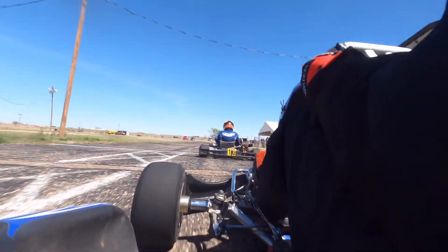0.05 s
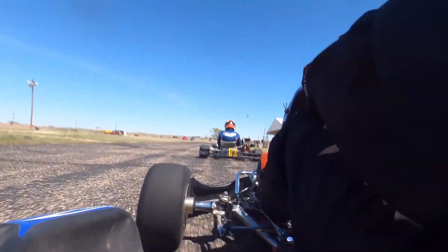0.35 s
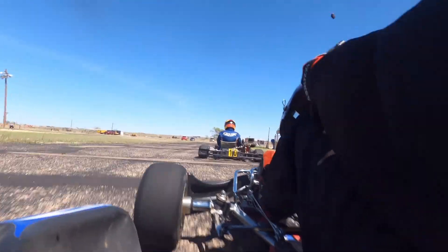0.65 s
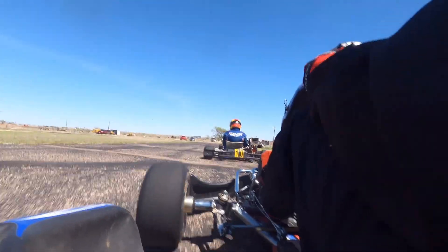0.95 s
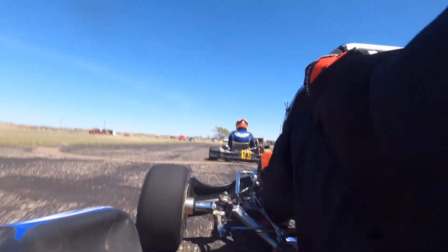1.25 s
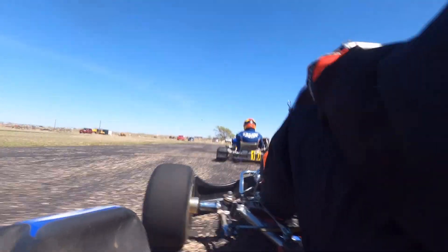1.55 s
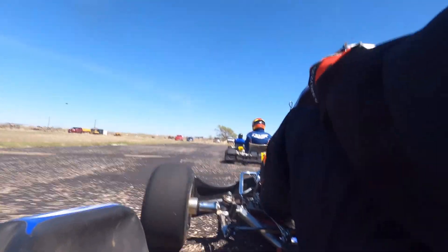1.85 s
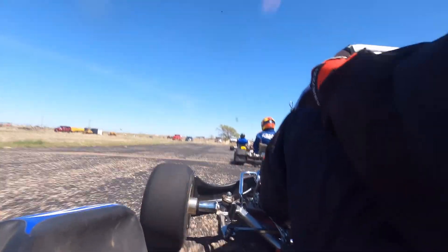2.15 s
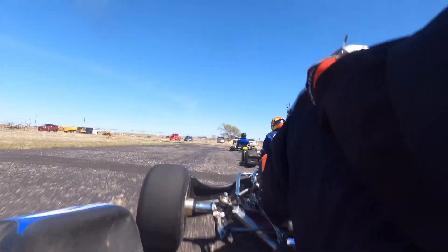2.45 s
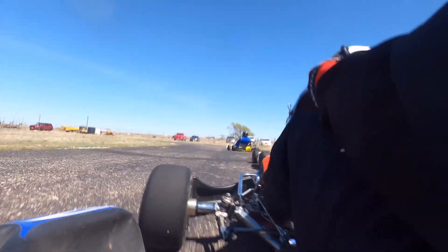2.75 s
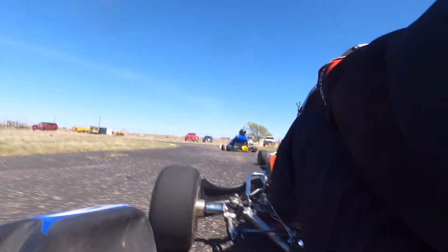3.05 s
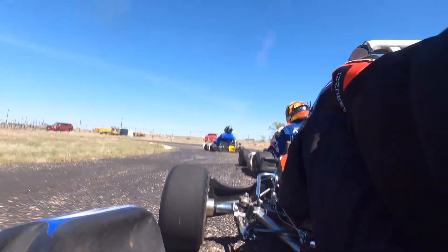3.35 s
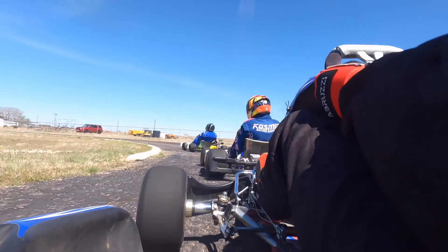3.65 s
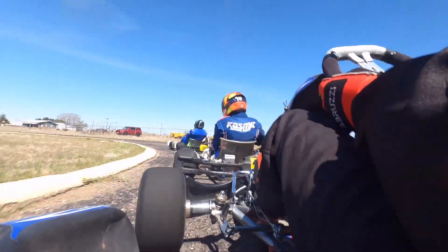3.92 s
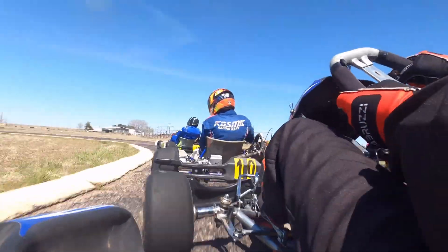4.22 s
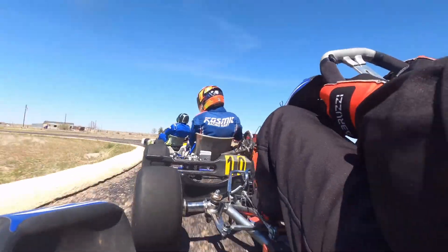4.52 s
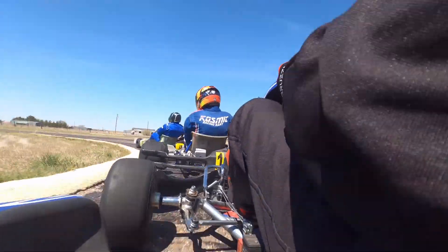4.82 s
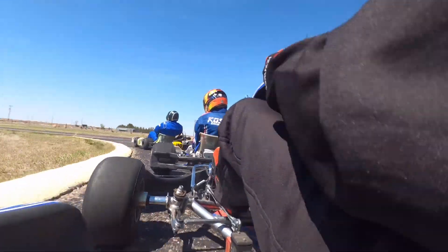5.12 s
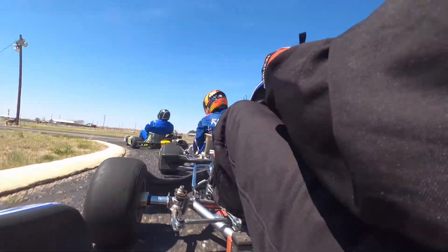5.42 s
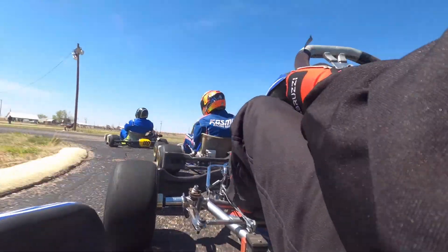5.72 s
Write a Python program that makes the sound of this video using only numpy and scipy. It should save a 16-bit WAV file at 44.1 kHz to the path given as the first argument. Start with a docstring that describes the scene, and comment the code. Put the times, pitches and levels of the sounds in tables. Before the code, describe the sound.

Close on-board sound of a racing kart's hard, clattering engine holding a steady pitch, then dropping as the tyres scrub through a corner.

```python
"""The hard, rattling drone of a single-cylinder four-stroke kart, heard from on board: flat out,
off the throttle, then on again through a bend. The crank shakes the frame once a turn and sets
metal parts rattling; the wheels rumble over coarse asphalt and grit ticks on the bodywork.
Bumps make the chassis shudder, the tyres scrub in the bend, and a limiter holds it all level."""
import sys
import numpy as np
from scipy import signal
from scipy.fft import rfft, irfft
from scipy.io import wavfile
from scipy.ndimage import uniform_filter1d

SR = 44100
rng = np.random.default_rng(int(sys.argv[2]) if len(sys.argv) > 2 else 0)


def store_pcm(level_fs):
    """Save levels as 16-bit WAV."""
    pcm = np.round(np.clip(level_fs, -1, 1) * 32767).astype(np.int16)
    wavfile.write(sys.argv[1], SR, np.atleast_2d(pcm).T)


N = 263718
T = np.arange(N) / SR
GEAR_RATIO = 4.7  # crank turns per axle turn
FLAT_OUT_HZ = 101  # crank turns per second

# hiss of chain and fine grit: frequency_hz, level_db
HISS = [(2000, -19.5), (4500, 2.5), (7000, -1), (8800, -15), (11000, -18.5), (13000, -15), (16000, -22)]
# bumps that make the chassis shudder: centre_s, pitch_hz, half_width_s, level_db
SHUDDERS = [(3.124, 114, 0.063, -14), (3.328, 103.5, 0.054, -8.5), (4.373, 89.6, 0.067, -11.5),
            (4.747, 96.4, 0.046, -11), (5.067, 123.6, 0.16, -16.5), (5.353, 128.9, 0.032, -15.5),
            (5.81, 109.7, 0.2, -19)]


def undb(db):
    """Decibels to gain."""
    return 10 ** (np.asarray(db) / 20)


def unit(x):
    """Scale to rms 1."""
    return x / np.sqrt(np.mean(x ** 2))


def curves(table):
    """The columns of a table, joined by straight lines in time."""
    times, *columns = np.transpose(table)
    return [np.interp(T, times, column) for column in columns]


def swell(centre_s, half_width_s):
    """A smooth rise and fall, peaking at 1."""
    return np.exp(-((T - centre_s) / half_width_s) ** 2)


def walk(rate_hz):
    """A smooth random wander, rms 1."""
    hold = max(int(SR / rate_hz), 1)
    steps = rng.standard_normal(N)[np.arange(N) // hold]
    return unit(uniform_filter1d(uniform_filter1d(steps, hold), hold))


def causal(x, gain_at, size=16384):
    """Minimum-phase filter with the curve gain_at(hz): it rings only after each blow."""
    hz = np.maximum(np.arange(size // 2 + 1) * SR / size, 1)
    cepstrum = irfft(np.log(gain_at(hz) + 1e-9))
    cepstrum[1:size // 2] *= 2
    cepstrum[size // 2 + 1:] = 0
    return signal.fftconvolve(x, irfft(np.exp(rfft(cepstrum))))[:len(x)]


def colour(x, points):
    """Equalise x along (frequency_hz, level_db) points."""
    hz, db = np.transpose(points)
    return causal(x, lambda f: undb(np.interp(np.log(f), np.log(hz), db)))


def rough_noise(spectrum, flicker_db, rate_hz):
    """Coloured noise with a flickering level, rms 1."""
    return unit(colour(rng.standard_normal(N) * undb(flicker_db * walk(rate_hz)), spectrum))


def ring(x, modes, muffle_hz):
    """Steep resonances, heard through a housing that muffles the treble; rms 1."""
    def gain_at(f):
        power = sum(undb(2 * db) / (1 + ((f / hz - hz / f) * hz / width) ** 2) ** 2
                    for hz, width, db in modes)
        return np.sqrt(power / (1 + (f / muffle_hz) ** 8))
    return unit(causal(x, gain_at))


def knocks(phase, scatter_db):
    """One click at each whole number of the phase, each of its own size."""
    at = np.flatnonzero(np.diff(np.floor(np.maximum.accumulate(phase))) > 0)
    clicks = np.zeros(N)
    clicks[at] = undb(scatter_db * rng.standard_normal(N)[:len(at)])
    return unit(clicks)


def sizzle(clicks, decay_s):
    """Turn each click into a dying burst of noise."""
    return signal.lfilter([1], [1, -np.exp(-1 / (decay_s * SR))], clicks) * rng.standard_normal(N)


def driven(crank_hz, flat_out_db, shut, slow, bend):
    """A level in dB, shifted by a shut throttle, each octave of slowing and full cornering."""
    # what the driver does: time_s, throttle (0-1), cornering (0-1)
    driver = [(0, 0.88, 0.26), (2.3, 0.87, 0.02), (2.72, 1, 0.03), (2.92, 0.06, 0), (4.3, 0.2, 0.3),
              (4.68, .9, 0.5), (5.05, 0.7, 1), (5.98, .8, 0.82)]
    throttle, cornering = curves(driver)
    octaves_down = np.log2(FLAT_OUT_HZ / crank_hz)
    return flat_out_db + shut * (1 - throttle) + slow * octaves_down + bend * cornering


def crank_shake(turns, crank_hz):
    """The drone: the unbalanced piston rocks the frame once a turn, with weak overtones."""
    level_db = driven(crank_hz, -12.5, shut=.05, slow=-2, bend=-4)
    uneven_db = driven(crank_hz, .58, shut=0, slow=1, bend=1)
    octave_db = driven(crank_hz, -18, shut=-2.5, slow=-4.5, bend=0)
    # a shuddering chassis passes on less of the shake
    duck_db = -4.5 * sum(swell(s, half_width) for s, _, half_width, _ in SHUDDERS)
    angle = 2 * np.pi * turns + .089 * uneven_db * walk(25)
    octave = undb(octave_db) * np.sin(2 * angle + .1 * walk(7.8))
    twelfth = undb(-20.5) * np.sin(3 * angle + .83 * walk(20))
    drone = np.sqrt(2) * (np.cos(angle) + octave + twelfth)
    return undb(level_db + duck_db + uneven_db * walk(36)) * drone


def valve_ticks(turns, crank_hz):
    """The valve gear ticks faintly once in each two-turn cycle, now and then much harder."""
    # the sharp tick: frequency_hz, level_db
    spectrum = [(1500, -12.5), (3400, -4), (7000, -2.5), (9000, -14.5), (11000, -22), (12600, -11.5),
                (14500, -7.5), (16000, -13)]
    ticks = np.tanh(knocks(turns / 2, scatter_db=7) / 60)
    level_db = driven(crank_hz, -67, shut=-1, slow=-15, bend=1)
    return undb(level_db) * unit(colour(sizzle(ticks, decay_s=.0008), spectrum))


def jolts():
    """Level swings in dB as the road throws the kart about: hops, rough patches, asphalt grain."""
    # loose parts float for an instant, then land: landing_s, lull_db, clash_db
    hops = [(0.135, -4.5, 1.5), (1.749, -2.5, 13), (2.172, -9.5, 2), (2.842, 1.5, 3.5), (2.94, -4, 3.5),
            (3.222, -6.5, -5), (3.46, -4.5, 3), (4.128, -11, 2.5), (4.22, -4, 1.5), (5.094, -2, 3.5),
            (5.578, -5.5, 6.5), (5.623, -13.5, 3.5), (5.657, -9, 0)]
    # rough patches that stir up the rattle: centre_s, half_width_s, boost_db
    patches = [(2.606, 0.12, 1.5), (3.323, 0.05, 7), (3.932, .11, 4)]
    float_s, lull_s, clash_s = .018, .011, .008
    hop_db = sum(lull_db * swell(s - float_s, lull_s) + clash_db * swell(s, clash_s)
                 for s, lull_db, clash_db in hops)
    patch_db = sum(db * swell(s, half_width) for s, half_width, db in patches)
    grain_db = 1.5 * walk(rate_hz=64.8)
    return hop_db + patch_db + grain_db


def rattle(turns, bunch_db, jolt_db):
    """Loose metal knocks about four times a crank turn, over the grind of chain and valve gear."""
    crank = 2 * np.pi * turns
    blows = knocks(4 * turns + .3 * walk(330), scatter_db=2)
    chatter = unit(sizzle(blows, decay_s=.0011))
    # the chain tightens and slackens once an axle turn, shifting the loud part of the stroke
    tension = np.cos(crank / GEAR_RATIO + .077 * walk(4))
    stroke_db = (5 * tension - 2) * np.cos(crank) + 3 * np.sin(2 * crank)
    push = undb(stroke_db + bunch_db * walk(150) + jolt_db)
    # the parts have little play: they fall silent more easily than they get louder
    force = push / np.sqrt(1 + (push / 1.4) ** 2)
    grind = undb(-5) * rng.standard_normal(N)
    return force * (undb(-11.5) * blows + chatter + grind)


def casing(blows, crank_hz):
    """The engine casing rings brightly under the rattle."""
    # casing resonances: pitch_hz, width_hz, level_db
    modes = [(2394, 760, 2.5), (2540, 530, -2.5), (3262, 860, -4.5), (3570, 1260, -9.5),
             (4660, 2400, -21.5), (6460, 1500, -24)]
    level_db = driven(crank_hz, -35.5, shut=-4, slow=-2, bend=1.5)
    return undb(level_db) * ring(blows, modes, muffle_hz=5430)


def clinks(axle_turns, scatter_db, slack_turns):
    """Each loose part is struck about once an axle turn; how it is seated sets its pitch."""
    # loose parts: pitch_hz, spread_hz, ring_s (to fall 60 dB), level_db
    parts = [(1067, 60, 0.025, 1), (1281, 47, 0.018, 9.5), (1478, 80, 0.033, -11), (2650, 70, .03, -13.5),
             (3234, 62, .03, -15)]
    age = np.arange(SR // 10) / SR
    attack = 1 - np.exp(-age / .004)
    out = np.zeros(N + len(age))
    for hz, spread_hz, ring_s, db in parts:
        envelope = attack * undb(-60 * age / ring_s)
        chance = rng.standard_normal((N // 1000, 3))
        place = rng.random()
        for turn in range(int(axle_turns[-1])):
            seat, size, late = chance[turn]
            at = np.searchsorted(axle_turns, turn + place + slack_turns * late)
            tone = np.sin(2 * np.pi * (hz + spread_hz * seat) * age)
            out[at:at + len(age)] += undb(db + scatter_db * size) * envelope * tone
    return unit(out[:N])


def frame(blows, turns, crank_hz, jolt_db):
    """Frame, mount and guards clatter under the rattle while loose parts clink along."""
    # their resonances: pitch_hz, width_hz, level_db
    modes = [(457, 430, -7), (664, 120, -3), (846, 330, -2), (1095, 366, 0), (1290, 345, -4.5),
             (1542, 364, -7)]
    clatter = ring(blows, modes, muffle_hz=2400)
    loose = undb(jolt_db - 8.5) * clinks(turns / GEAR_RATIO, scatter_db=1.35, slack_turns=.2)
    return undb(driven(crank_hz, -19, shut=-2.5, slow=0, bend=-.8)) * (clatter + loose)


def chain(blows, crank_hz, jolt_db):
    """The chain hisses under load and rings its sprocket as the frame twists."""
    # axle sprocket resonances: pitch_hz, width_hz, level_db
    modes = [(2635, 250, -3.5), (3366, 180, 1)]
    sprocket_db = driven(crank_hz, -53, shut=-4.5, slow=3, bend=5)
    hiss_db = driven(crank_hz, -60.5, shut=-3.5, slow=-4, bend=-2.5) + jolt_db
    hiss = rough_noise(HISS, flicker_db=3, rate_hz=120)
    return undb(sprocket_db) * ring(blows, modes, muffle_hz=6000) + undb(hiss_db) * hiss


def road(crank_hz):
    """The unsprung frame passes on the grain of the asphalt as a rumble."""
    # rumble through the frame: frequency_hz, level_db
    spectrum = [(20, -39), (70, -7.5), (110, 4.5), (150, 1.5), (220, 0.5), (300, 0), (400, -5), (550, -8.5),
                (900, -32.5), (3000, -74)]
    level_db = driven(crank_hz, -19.5, shut=.5, slow=1, bend=-1.5)
    return undb(level_db) * rough_noise(spectrum, flicker_db=.52, rate_hz=60)


def sway(crank_hz):
    """The chassis sways and hops: a deep wallow, heaviest in the bend."""
    # chassis motion: frequency_hz, level_db
    spectrum = [(8, -15), (22, -1), (42, -2.5), (55, 0.5), (70, 9.5), (90, 0.5), (130, -6.5), (250, -37),
                (1000, -85)]
    level_db = driven(crank_hz, -22, shut=-1, slow=1.5, bend=5.5)
    return undb(level_db) * unit(colour(rng.standard_normal(N), spectrum))


def grit():
    """Small stones crack on the bodywork; finer grit patters off the tyres in sprays."""
    # stone strikes: start_s, level_db
    stones = [(0.177, -38), (0.54, -35.5), (0.6847, -40), (2.377, -36.5), (2.688, -36), (3.244, -40),
              (4.0493, -37), (4.071, -37), (4.126, -38), (4.145, -41), (5.239, -32)]
    # crack of a stone: frequency_hz, level_db
    spectrum = [(300, -22), (1500, -4.5), (3400, 6.5), (5000, 0.5), (7000, -4.5), (9000, -21),
                (11000, -34.5), (12700, -11.5), (14500, -16), (16000, -22.5)]
    # sprays of fine grit: centre_s, half_width_s, level_db
    sprays = [(.68, 0.1, -56), (2.651, 0.49, -57), (4.12, .1, -57.5), (5.31, .08, -59)]
    decay_s = .0064
    hits = sum(undb(db) * (T >= s) * np.exp(-np.maximum(T - s, 0) / decay_s) for s, db in stones)
    patter = rough_noise(HISS, flicker_db=5, rate_hz=400)
    patter *= sum(undb(db) * swell(s, half_width) for s, half_width, db in sprays)
    return undb(1) * colour(hits * rng.standard_normal(N), spectrum) + patter


def shudders():
    """Each bump makes the chassis swing for a few cycles."""
    phases = rng.uniform(0, 2 * np.pi, len(SHUDDERS))
    return sum(undb(db) * swell(s, half_width) * np.sin(2 * np.pi * hz * T + phase)
               for (s, hz, half_width, db), phase in zip(SHUDDERS, phases))


def tyre_scrub(jolt_db):
    """Sliding rubber sticks and slips unsteadily: a hoarse squeal over the tyre wall's groan."""
    # the squeal through the bend: time_s, pitch_hz, level_db
    slide = [(4.36, 1037, -60), (4.47, 1019, -28), (4.65, 1022, -25.5), (4.95, 1029, -26.5),
             (5.45, 1090, -22.5), (5.98, 1023, -24.5)]
    hz, db = curves(slide)
    angle = 2 * np.pi * np.cumsum(hz * (1 + .085 * walk(420))) / SR
    squeal = unit(np.sin(angle) * undb(3.5 * walk(130)))
    groan = ring(rng.standard_normal(N), [(645, 110, 0)], muffle_hz=1500)
    # the tyres bite harder or skip with each jolt
    return undb(db + jolt_db) * (squeal + undb(-5) * groan)


def scene():
    """The kart follows crank, driver and road; the frame carries it all to the listener."""
    # engine speed: time_s, crank_hz (turns per second)
    engine_speed = [(0.0, 98.7), (1.01, 100.7), (2.75, 100.6), (2.95, 95.75), (3.2, 85.42), (3.48, 79.4),
                    (3.7, 77.2), (3.85, 78.5), (4.61, 67.1), (4.86, 65.87), (5.33, 64.94), (5.53, 68.82),
                    (5.75, 63.5), (5.9, 62.1), (5.98, 58)]
    crank_hz, = curves(engine_speed)
    turns = np.cumsum(crank_hz) / SR
    jolt_db = jolts()
    bunch_db = driven(crank_hz, 1.1, shut=.28, slow=.68, bend=.92)  # the rattle comes in bunches
    blows = rattle(turns, bunch_db, jolt_db)
    metal = casing(blows + .6 * rattle(turns, bunch_db, jolt_db), crank_hz)
    metal += frame(blows, turns, crank_hz, jolt_db) + chain(blows, crank_hz, jolt_db)
    engine = crank_shake(turns, crank_hz) + valve_ticks(turns, crank_hz)
    chassis = road(crank_hz) + sway(crank_hz) + shudders()
    return (engine + metal + chassis + tyre_scrub(jolt_db) + grit())[None]


def limit(x, ceiling_db, window_s):
    """Fast limiter: the gain dips smoothly as the short-term level reaches the ceiling."""
    window = max(int(window_s * SR), 1)
    power = uniform_filter1d(uniform_filter1d(x ** 2, window), window)
    level = np.sqrt(np.abs(power))
    return x / (1 + (level / undb(ceiling_db)) ** 4) ** (1 / 4)


def record(dry):
    """A camera bolted to the frame limits the level, rounds the last peaks and cuts the top."""
    held = limit(dry * undb(2.5), ceiling_db=-9.5, window_s=.013)
    rounded = held / (1 + (held / .9) ** 6) ** (1 / 6)
    top_hz = 15800
    return signal.sosfilt(signal.ellip(8, .2, 70, top_hz, fs=SR, output="sos"), rounded)


dry = scene()
out = record(dry)
store_pcm(out)
```